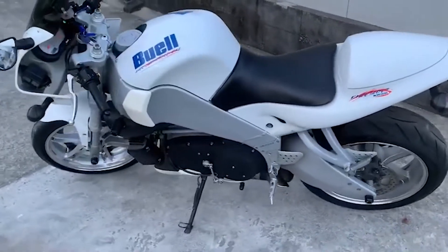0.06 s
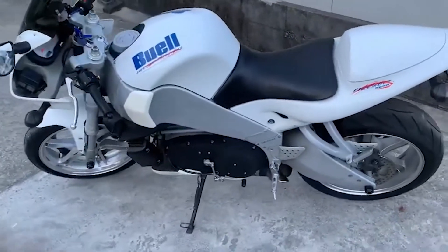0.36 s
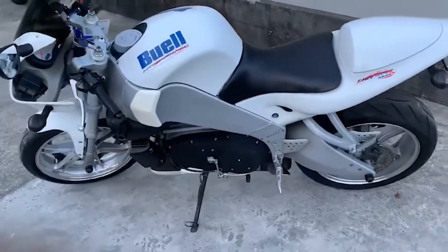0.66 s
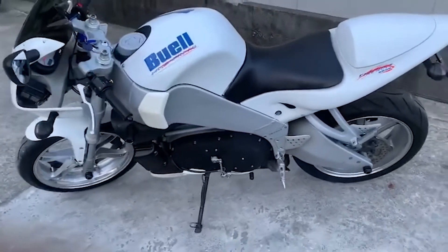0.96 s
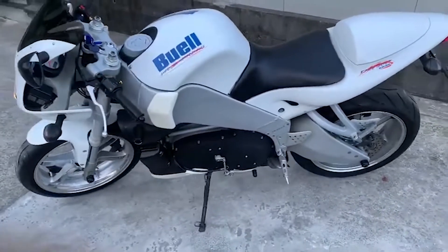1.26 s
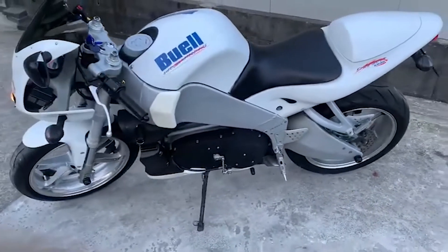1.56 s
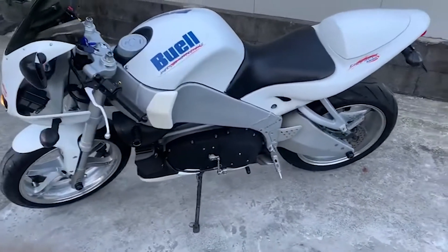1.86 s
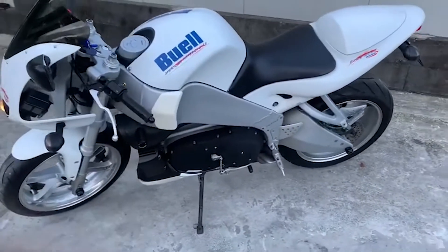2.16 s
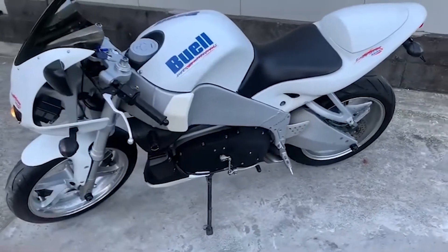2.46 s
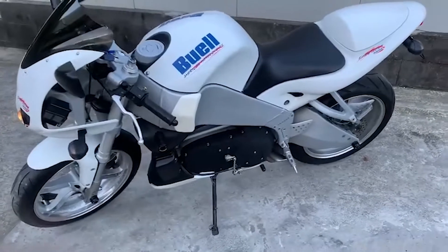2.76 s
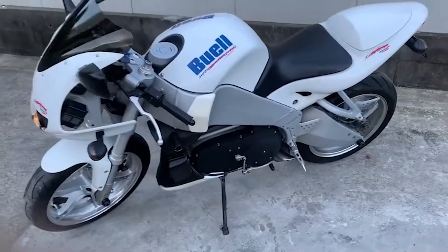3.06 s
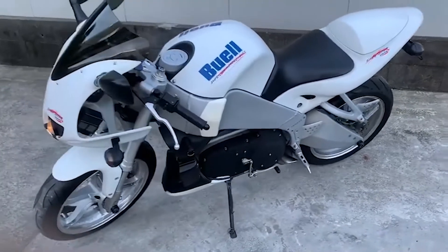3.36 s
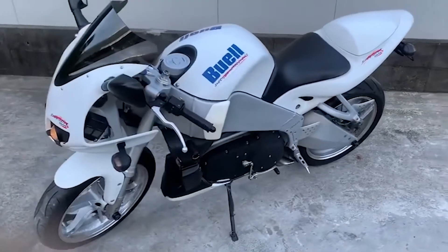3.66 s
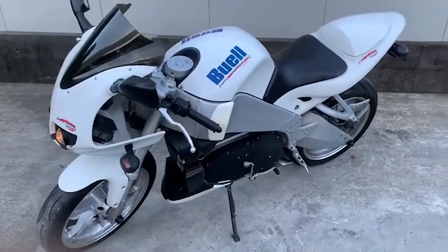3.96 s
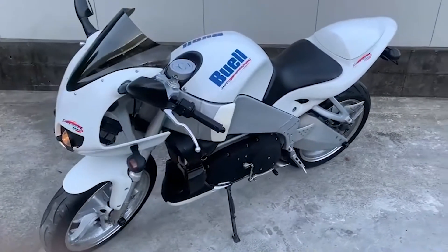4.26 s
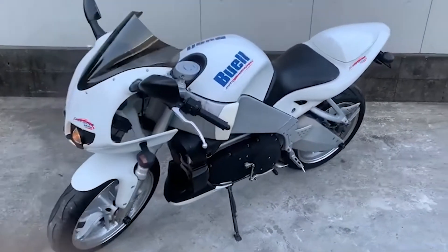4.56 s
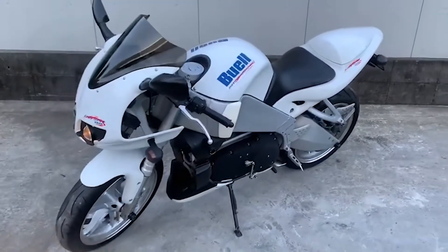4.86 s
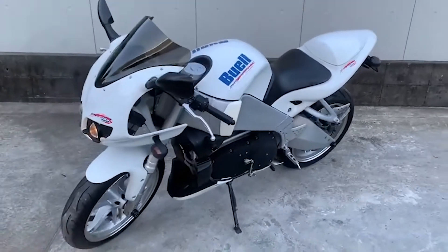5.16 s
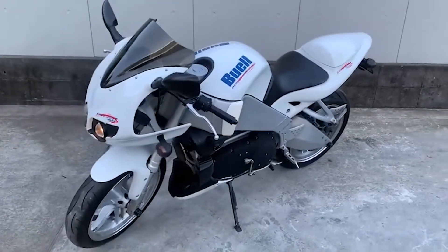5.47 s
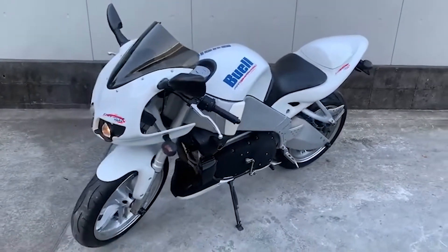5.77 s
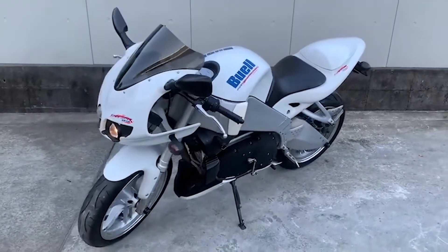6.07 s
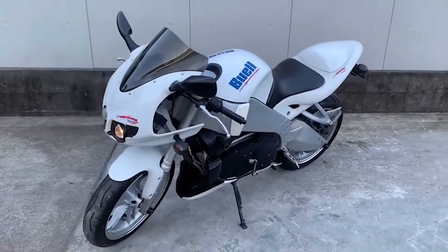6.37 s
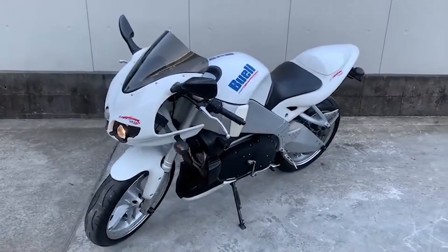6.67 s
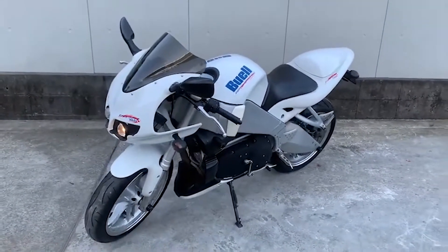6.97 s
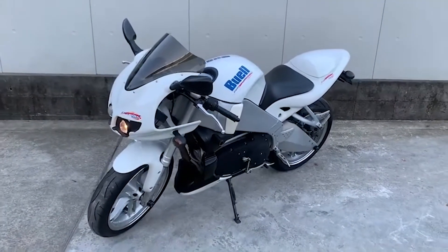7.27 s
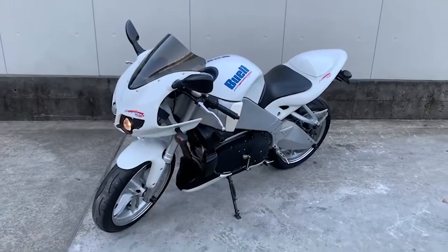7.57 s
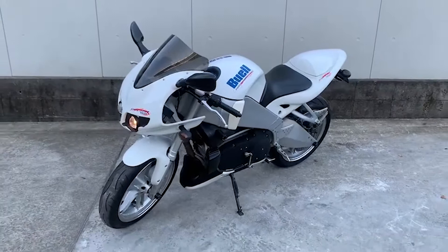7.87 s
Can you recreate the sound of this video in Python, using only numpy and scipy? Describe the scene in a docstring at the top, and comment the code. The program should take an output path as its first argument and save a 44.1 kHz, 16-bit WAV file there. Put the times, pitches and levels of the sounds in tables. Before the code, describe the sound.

A parked two-cylinder motorcycle idles outdoors with a deep, limping beat. Each firing thumps through the silencer with a sharp spit of hiss, and now and then one is weak or skipped. Valves tick and engine parts clatter under a faint whine. The microphone moves slowly from the side to the front, so the exhaust softens a little and a light fairing rattle comes in toward the end.

```python
"""A motorcycle idling in a yard

An air-cooled two-cylinder engine lopes on a concrete yard, skipping a firing now and then.
Each firing spits a sharp hiss and thumps through the silencer. Valves and other moving parts
clatter, a gear whines and the fairing (the front cover) rattles. The listener walks slowly
from the side of the machine to its front, near a wall."""
import sys
import numpy as np
from scipy import signal
from scipy.fft import rfft, irfft, next_fast_len
from scipy.io import wavfile
from scipy.ndimage import uniform_filter1d, map_coordinates

SR = 44100
rng = np.random.default_rng(int(sys.argv[2]) if len(sys.argv) > 2 else 0)


def dump(signal):
    """Clip the signal to [-1, 1] and save it as 16-bit WAV at the path in sys.argv[1]."""
    limited = np.clip(np.atleast_2d(signal).T, -1, 1)
    pcm = np.round(limited * 32767).astype(np.int16)
    wavfile.write(sys.argv[1], SR, pcm)


N = 358520

# the drifting idle speed: (time [s], speed [crank turns a minute])
IDLE_SPEED = [(0.0, 1078), (0.32, 1130), (1.22, 1017), (1.59, 1081), (1.83, 1000), (2.46, 1110),
              (3.05, 981), (3.61, 1043), (4.26, 1039), (4.39, 1050), (4.88, 986), (5.49, 1059),
              (6.11, 1022), (6.7, 1014), (7.28, 1092), (7.64, 1042), (8.13, 1036)]
# where the listener is: (time [s], place [0 side, 1 front corner, 2 front])
LISTENER_PATH = [(0, 0.15), (1.2, 0.37), (3.4, 0.75), (4.2, 1.06), (5.4, 1.76), (8.13, 1.95)]


def amp(db):
    """Turn decibels into a gain."""
    return 10 ** (np.asarray(db) / 20)


def unit(x):
    """Scale x to an average strength (rms) of 1."""
    return x / np.sqrt(np.mean(x ** 2) + 1e-20)


def along(points, hz):
    """Read between (frequency, value) points on a log frequency axis."""
    freqs, values = np.transpose(points)
    return np.interp(np.log(hz + 1), np.log(freqs + 1), values)


def curve(points):
    """Join (time, value) points into one value per sample."""
    return np.interp(np.arange(N) / SR, *np.transpose(points))


def wobble(rate):
    """A smooth curve through `rate` random values a second."""
    return map_coordinates(rng.standard_normal(int(N * rate / SR) + 4), [np.arange(N) * rate / SR])


def filtered(x, response):
    """Scale and shift each frequency in x by response(hz)."""
    size = next_fast_len(N + SR // 2)
    return irfft(rfft(x, size) * response(np.fft.rfftfreq(size, 1 / SR)), size)[..., :N]


def coloured(x, spectrum):
    """Shape the tone of x with (frequency, level) points, then scale it to strength 1."""
    return unit(filtered(x, lambda hz: amp(along(spectrum, hz))))


def noise():
    """Two unrelated white noises."""
    return rng.standard_normal((2, N))


def pulse_response(gain, size=16384):
    """How a body with this gain(hz) answers one sharp push, as early as it can (minimum phase)."""
    cepstrum = irfft(np.log(gain(np.fft.rfftfreq(size, 1 / SR)) + 1e-6))
    cepstrum[1:size // 2] *= 2
    cepstrum[size // 2 + 1:] = 0
    return irfft(np.exp(rfft(cepstrum)))


def play(times, gains, shape):
    """Place one scaled copy of shape at each time."""
    hits = np.bincount(np.round((times + 1) * SR).astype(int), gains, N + 2 * SR)
    return signal.fftconvolve(hits, shape)[SR:SR + N]


def place_each(times, sounds):
    """Place a different short sound at each time."""
    where = np.round((times + 1) * SR).astype(int)[..., None] + np.arange(sounds.shape[-1])
    return np.bincount(where.ravel(), sounds.ravel(), N + 2 * SR)[SR:SR + N]


def puff(rise_s, decay_s):
    """A loudness shape that swells to 1 and dies away."""
    t = np.arange(SR // 8) / SR
    shape = (1 - np.exp(-(t / rise_s) ** 2)) * np.exp(-t / decay_s)
    return shape / shape.max()


def struck(times, db, modes, rise_s, scatter_db, size=4000):
    """Blows ring a body's own tones (modes); each tone falls 60 dB in its ring time."""
    hz, level, ring_s = np.transpose(modes)[..., None]
    t = np.arange(size) / SR
    rings = amp(level - 60 * t / ring_s) * np.exp(2j * np.pi * hz * t) * (1 - np.exp(-t / rise_s))
    draws = rng.standard_normal((len(times), 3, len(modes))).transpose(1, 0, 2)
    strengths = amp(db[:, None] + scatter_db * draws[0])
    phases = np.exp(2j * np.pi * draws[1:])
    return np.array([place_each(times, blows) for blows in ((strengths * phases) @ rings).real])


def stereo(pair, mid_gain, side_gain, direct):
    """Make left and right; the `direct` share of the side is the mid sound a quarter wave ahead."""
    mid = filtered(pair[0], mid_gain)
    linked = filtered(pair[0], lambda hz: 1j * direct * side_gain(hz))
    side = linked + np.sqrt(1 - direct ** 2) * filtered(pair[1], side_gain)
    return np.array([mid + side, mid - side])


def spread(pair):
    """Spread an engine sound broadly between left and right."""
    # stereo width: (frequency [Hz], side over mid [dB])
    width = [(60, -5), (280, -57), (500, -8), (1200, -9.5), (2000, -2.5), (2700, -4.5), (3200, 6.5),
             (4000, -15), (5300, 14.5)]
    return stereo(pair, np.ones_like, lambda hz: amp(along(width, hz)), direct=0.56)


def treble_spread(pair, half_turn_hz=4900, in_step_hz=6100):
    """Treble reaches left and right at different times, so how well they line up depends on pitch."""
    angle = lambda hz: np.pi * np.maximum((hz - in_step_hz) / half_turn_hz, 0.12)
    return stereo(pair, lambda hz: np.cos(angle(hz)), lambda hz: np.sin(angle(hz)), direct=-.7)


def firings(lag_s=.0151, slow_s=.3, catch_up_s=.911, rebound_db=1.43, rebound_s=0.13):
    """Two cylinders fire in turn, each once in two crank turns. Gives times, thump dB and hiss dB."""
    # weak or missed firings: (time [s], level against a full burn [dB])
    stumbles = [(0.15, -8), (0.32, -5), (0.37, -29.5), (0.48, -15), (0.94, -25.5), (1.05, -14),
                (1.24, -2.5), (1.29, -12), (1.41, -5), (1.64, -21), (1.75, -11), (1.99, -3), (2.22, -11),
                (2.4, -3), (2.45, -11.5), (2.55, -18), (2.89, -19.5), (3.01, -12), (3.26, -4), (3.44, -3.5),
                (3.49, -4.5), (3.67, -2), (3.72, -3.5), (3.9, -9), (3.95, -4), (4.13, -7), (4.18, -23.5),
                (4.3, -3), (4.53, -21.5), (4.65, -12), (4.89, -5), (5.08, -7), (5.25, -10), (5.36, -5),
                (5.54, -3.5), (5.59, -22.5), (5.71, -24.5), (5.77, -2.5), (5.94, -19), (6.06, -5.5),
                (6.29, -4), (6.64, -19.5), (6.75, -4), (6.99, -15), (7.1, -10), (7.28, -3.5), (7.33, -7.5),
                (7.55, -11.5), (7.66, -5), (7.84, -2.5), (7.89, -17.5), (8.01, -11)]
    # firings whose hiss has its own strength: (time [s], level [dB])
    odd_spits = [(.04, -27.5), (.1, -29), (.26, -29), (.32, -35), (.43, -27), (.59, -30.5), (.71, -41.5),
                 (.88, -31), (1.12, -29), (1.17, -29), (1.47, -31), (1.58, -28.5), (1.82, -28.5),
                 (1.87, -27.5), (1.94, -29.5), (2.05, -29), (2.17, -31), (2.28, -29.5), (2.33, -26),
                 (2.39, -35.5), (2.5, -28), (2.61, -30), (2.66, -30.5), (2.73, -30), (3.08, -29.5),
                 (3.32, -29.5), (3.44, -35.5), (3.67, -34.5), (3.78, -30), (3.83, -32), (4.01, -28.5),
                 (4.36, -30.5), (4.42, -28.5), (4.59, -29), (4.72, -31), (4.96, -30), (5.13, -33),
                 (5.19, -30.5), (5.42, -29), (5.47, -28), (5.77, -31), (5.82, -27), (5.89, -30.5),
                 (6.0, -30), (6.12, -27.5), (6.24, -31.5), (6.35, -30.5), (6.59, -32), (6.87, -32),
                 (7.16, -32), (7.21, -31), (7.5, -32.5), (7.72, -29.5)]
    cycle = np.cumsum(curve(IDLE_SPEED)) / (2 * 60 * SR)
    number = np.arange(2 * int(cycle[-1]) + 1)
    is_second = number % 2
    # the second cylinder fires before half a cycle is up, so the beat limps
    due = np.interp(number // 2 + .445 * is_second, cycle, np.arange(N) / SR) - .0062
    weak_s, weak_db = np.transpose(stumbles)
    burn_db = np.bincount(abs(due[:, None] - weak_s + lag_s).argmin(axis=0), weak_db, len(number))
    lost = 1 - amp(burn_db)
    since = np.maximum(due[:, None] - due, 0)
    # a lost burn slows the crank: later firings fall behind, then catch up
    times = due + lag_s * ((1 - np.exp(-since / slow_s)) * np.exp(-since / catch_up_s)) @ lost
    # after a miss the crank runs slower and draws in a fuller charge, so the next firings are stronger
    burn_db = burn_db + rebound_db * ((since > 0) * np.exp(-since / rebound_s)) @ lost
    # both sounds fade as the listener walks away from the pipe
    thump_db = 1.8 + .8 * is_second + burn_db - 0.47 * times
    hiss_db = -33.5 + 0.5 * is_second + 4.6 * burn_db - 0.56 * times
    odd_s, odd_db = np.transpose(odd_spits)
    hiss_db[abs(times[:, None] - odd_s).argmin(axis=0)] = odd_db
    return times, thump_db, hiss_db


def exhaust_spit(level_db=4.5, lead_s=.0036, swell_s=.0068, decay_s=.009, tail_s=.025, split_hz=9500):
    """As the exhaust valve opens, gas hisses out just ahead of the thump and trails off."""
    times, _, db = firings()
    t = np.arange(-SR // 50, SR // 10) / SR
    after = np.maximum(t, 0)
    swell = np.exp(-(np.minimum(t, 0) / swell_s) ** 2)
    blow = swell * (np.exp(-after / decay_s) + amp(-18) * np.exp(-after / tail_s))
    # tone of the spitting gas: (frequency [Hz], level [dB])
    hiss_tone = [(1500, -21), (3000, -13), (4200, -6), (5500, -10), (7000, 1.5), (8600, 3), (11000, 1.5),
                 (13500, -2), (15600, -4.5)]
    hiss = coloured(noise(), hiss_tone)
    dull = filtered(hiss, lambda hz: 1 / (1 + (hz / split_hz) ** 12))
    jet = 0
    for band in (dull, hiss - dull):  # each varies alone, so spits come duller or brighter
        sizes = amp(db + level_db + 1.3 * rng.standard_normal(len(times)))
        flutter = amp(1.2 * wobble(400))
        jet = jet + play(times - lead_s + t[0], sizes, blow) * flutter * band
    return treble_spread(jet)


def pipe_gas(flow_db=-33, chuff_db=-37.5, bark_db=-7):
    """Swirling gas chuffs down the pipe with each pulse; the second cylinder barks on a hard burn."""
    # tone of the gas in the pipe: (frequency [Hz], level [dB])
    chuff_tone = [(15, -22), (28, -9), (42, 0), (60, -7.5), (100, -4), (130, -3.5), (190, -17), (290, -14),
                  (380, -19.5), (800, -70)]
    # tone of the bark: (frequency [Hz], level [dB])
    bark_tone = [(200, 3), (320, -5), (450, -4), (700, -6), (1300, -2), (2000, -8), (4000, -49)]
    times, thump_db, hiss_db = firings()
    flow = amp(flow_db) + play(times - .012, amp(thump_db + chuff_db), puff(.005, .054))
    bark = play(times[1::2] - .013, amp(hiss_db[1::2] + bark_db), puff(.0069, .034))
    return spread(flow * coloured(noise(), chuff_tone) + bark * coloured(noise(), bark_tone))


def pipe_ring(level_db=-7, lead_s=0.0064):
    """Every blast leaves the thin exhaust pipes ringing, each time with a new mix of tones."""
    # tones of the pipes: (frequency [Hz], level [dB], ring time [s])
    modes = [(3780, -3, 0.1), (4080, 1, 0.053), (4580, 1, 0.08), (5260, -4, 0.076), (6860, 6.5, 0.072),
             (6990, 2, .03), (8000, -14, 0.037), (8200, -16, 0.044), (8600, -8, .04), (9400, -25, 0.03),
             (10600, -16, .05), (12500, -6, .05), (13400, -3, .035)]
    times, _, db = firings()
    return treble_spread(struck(times - lead_s, db + level_db, modes, rise_s=0.0071, scatter_db=3.5))


def silencer_thump(cutoff_hz=1100):
    """Each firing sends one pressure pulse through the silencer."""
    # the silencer's answer to a pulse: (frequency [Hz], level [dB])
    silencer = [(20.0, -28.0), (38.0, 30.0), (55.0, 40.5), (66.0, 42.5), (78.0, 40.0), (87.0, 36.5),
                (101.0, 38.0), (117.0, 30.0), (131, 32), (150.0, 26.5), (205.0, 12.5), (235, 17),
                (315.0, 19.5), (365.0, 3.0), (900.0, -16.0)]
    times, db, _ = firings()
    thump = pulse_response(lambda hz: amp(along(silencer, hz)) / np.sqrt(1 + (hz / cutoff_hz) ** 4))
    return play(times, -amp(db + .3 * rng.standard_normal(len(times))), thump)


def clatter(cycles, jitter_s=0.0011, parts=36, size=1800):
    """Chain, cams and pistons knock at set points of every cycle, each with its own metallic ring."""
    offsets = (np.arange(parts) + rng.uniform(0, 1, parts)) / parts * np.diff(cycles).mean()
    rings = rng.standard_normal((2, parts, size)) * puff(.0004, .008)[:size]
    times = cycles[:, None] + offsets + jitter_s * rng.standard_normal((len(cycles), parts))
    sizes = amp(rng.uniform(-4.0, 3.2, parts) + rng.uniform(-2.9, 3.5, times.shape))
    return unit(np.array([place_each(times, sizes[..., None] * ring) for ring in rings]))


def engine_cases(intake_db=-4, surge_db=1.1):
    """Moving parts clatter and churn inside the metal cases, whose tone changes along the walk."""
    # the cases from the side: (frequency [Hz], level [dB])
    side = [(100, -27), (170, -3), (231, -21), (318, 6), (362, -3.5), (415, 5.5), (480, 3), (569, -13),
            (639, 2), (818, -13.5), (1110, -6), (1620, -12), (1820, -18), (2230, -17), (2940, -20),
            (5500, -32.5), (7150, -44), (12100, -120)]
    # from the front corner: (frequency [Hz], level [dB])
    corner = [(100, -24), (170, -1.5), (304, -1.5), (342, -4.5), (478, -2), (648, -6), (687, -10.5),
              (842, -6), (1420, -12), (1960, -20.5), (2400, -12), (2740, -17.5), (3070, -27.5),
              (3400, -19.5), (5500, -45), (7150, -39), (12100, -120)]
    # from the front: (frequency [Hz], level [dB])
    front = [(100, -2.5), (170, -10.5), (313, -3), (352, -13), (413, -3), (514, -7.5), (658, 0.5),
             (1160, -17.5), (1530, -9), (1850, -9.5), (2110, -23), (2740, -14), (3210, -27.5),
             (3610, -28.5), (5500, -46), (7150, -66), (12100, -120)]
    # loudness of the cases: (time [s], level [dB])
    loudness = [(0, -28.5), (1, -30.5), (2.5, -31), (5, -30.5), (6, -32), (8.13, -32.5)]
    times, db, _ = firings()
    cycles = times[::2]
    load = play(times - .005, amp(db), puff(.005, .025))  # every burn shakes the parts harder
    shaking = (clatter(cycles) + amp(-3) * noise()) * amp(load)
    place = curve(LISTENER_PATH)
    heard = sum(np.clip(1 - abs(place - k), 0, 1) * coloured(shaking, tone)
                for k, tone in enumerate([side, corner, front]))
    # a hollow rush of air comes once a cycle: (frequency [Hz], level [dB])
    air_tone = [(220, -25), (330, -1), (450, 0), (580, -4), (850, -18), (1500, -50)]
    gulp = play(cycles + 0.07, np.ones(len(cycles)), puff(.033, .011))
    screening = amp(intake_db - 3 * place)  # the fairing screens it from the front
    intake = screening * gulp * coloured(noise(), air_tone)
    return spread(amp(curve(loudness) + surge_db * wobble(16)) * (heard + intake))


def chain_sizzle(level_db=-43, flutter_db=2.5):
    """The running chain and the ringing cooling fins keep up a fine, restless sizzle."""
    # tone of the sizzle: (frequency [Hz], level [dB])
    tone = [(2500, -16), (4000, 4), (5500, 0), (6800, 5.5), (8500, -5.5), (11000, 4.5), (12600, -5.5),
            (13500, -4), (15600, -17)]
    return treble_spread(amp(level_db + flutter_db * wobble(180)) * coloured(noise(), tone))


def gear_whine(pitch_hz=651, level_db=-2.0, warble=0.4):
    """Meshing drive teeth sing and warble once a crank turn, warbling more from the front."""
    # loudness of the whine: (time [s], level [dB])
    loudness = [(0, -42), (.3, -34.5), (.7, -39.5), (1, -35), (1.25, -47), (1.65, -45), (2.0, -37.5),
                (2.6, -50), (3.5, -52), (3.95, -50), (4.1, -39), (4.8, -42), (5.2, -34), (5.5, -38),
                (5.85, -35.5), (6.15, -53), (6.6, -36), (7.0, -48), (7.35, -38), (7.9, -41), (8.13, -37)]
    crank_angle = 2 * np.pi * np.cumsum(curve(IDLE_SPEED)) / (60 * SR)
    phase = 2 * np.pi * pitch_hz * np.arange(N) / SR + .1 * wobble(22) + .4 * wobble(4)
    phase += warble * curve(LISTENER_PATH) * np.sin(crank_angle)
    return amp(curve(loudness) + level_db) * unit(amp(.7 * wobble(14)) * np.sin(phase))


def fin_pings(level_db=-53, range_db=3, count=300):
    """Small knocks of the moving parts make the cooling fins ping."""
    # tones of the fins: (frequency [Hz], level [dB], ring time [s])
    modes = [(3510, 3.5, 0.08), (3720, 4, 0.097), (3940, 2.5, 0.059), (4090, 1, 0.048), (4440, -1.5, .05),
             (5120, -4.5, 0.084)]
    shift, strength = rng.uniform(-1, 1, (count, 2)).T
    times = (np.arange(count) + shift) / count * N / SR
    return spread(struck(times, level_db + range_db * strength, modes, rise_s=0.00084, scatter_db=4.5))


def airbox_boom(level_db=2.0, delay_s=0.037, other_delay_s=.081, other_db=-2):
    """Each cylinder sucks in air once a cycle, burning or not, and the air filter box booms softly."""
    # the box's answer to one breath: (frequency [Hz], level [dB])
    airbox = [(25, -41), (45, 7), (62, -48), (80, 25), (100, 27.5), (140, -1.5), (250, -24), (600, -60)]
    cycles = firings()[0][::2]
    boom = pulse_response(lambda hz: amp(along(airbox, hz)))
    sizes = amp(level_db + 2 * rng.standard_normal((2, len(cycles))))
    first = play(cycles + delay_s, sizes[0], boom)
    return first + play(cycles + other_delay_s, amp(other_db) * sizes[1], boom)


def hollow_knocks():
    """Slack in the drive now and then knocks its hollow case, heard from the side."""
    # the hardest knocks: (time [s], level [dB])
    knocks = [(.036, -22.5), (.114, -22.5), (.194, -27), (.509, -21), (.733, -27), (.812, -26),
              (1.092, -22), (1.593, -26.5), (2.095, -23), (2.249, -27.5), (2.915, -26), (3.522, -26)]
    # tones of the drive case: (frequency [Hz], level [dB], ring time [s])
    modes = [(405, -5, .06), (452, 3.5, .08), (505, -8, .05)]
    times, db = np.transpose(knocks)
    return spread(struck(times, db, modes, rise_s=0.0023, scatter_db=0))


def valve_taps(level_db=-43.0, delay_s=0.0569, other_delay_s=0.093, other_db=-12):
    """The valves snap shut after each firing and ring their covers, one cylinder more than the other."""
    # tones of the valve covers: (frequency [Hz], width [Hz], level [dB])
    modes = [(1556, 135, 3), (2337, 41, 5), (2426, 29, 6.5), (2687, 34, 11), (2900, 63, 1), (2990, 86, 0.5),
             (3300, 110, -3.5), (3510, 47, -2), (3930, 120, -9)]
    cycles = firings()[0][::2]
    sizes = amp(rng.normal(0, .4, (2, len(cycles))))
    rattle = puff(.003, .022)
    taps = play(cycles + delay_s, sizes[0], rattle)
    taps += play(cycles + other_delay_s, amp(other_db) * sizes[1], rattle)
    covers = lambda hz: sum(
        (-1) ** k * amp(db) * 1j * hz * width / (centre ** 2 - hz ** 2 + 1j * hz * width)
        for k, (centre, width, db) in enumerate(modes))
    ring = filtered(noise(), covers)
    # the mix of tones changes from tap to tap, their total strength does not
    ring /= np.sqrt(abs(uniform_filter1d(ring ** 2, size=600)) + 1e-12)
    # from the side the frame hides the covers, from the front the fairing does
    place = curve(LISTENER_PATH)
    hidden_db = -4 * np.clip(1 - place, 0, 1) - np.clip(place - 1, 0, 1)
    return spread(amp(level_db + hidden_db) * unit(taps * ring))


def fairing_rattle(level_db=-8):
    """Shaken by the engine, loose parts knock behind the fairing in short, ringing clusters."""
    # the knocks: (time [s], level [dB])
    knocks = [(0.959, -31), (5.5024, -30), (5.6013, -29), (5.728, -29), (6.1739, -31), (6.323, -31),
              (6.871, -29), (7.022, -25.5), (7.0763, -31), (7.1097, -37), (7.126, -35), (7.21, -25.5),
              (7.224, -34), (7.243, -34), (7.3542, -32), (7.426, -29), (7.574, -29.5), (7.657, -34),
              (7.7695, -29), (7.7898, -27), (7.911, -29.5)]
    # tones of the fairing: (frequency [Hz], level [dB], ring time [s])
    modes = [(780, -2, .04), (1195, -1, .035), (1460, 7, 0.051), (1590, 2, 0.097), (1806, 2.5, 0.055),
             (1920, -15, .04), (2420, -17, .05), (2470, -5, .05)]
    times, db = np.transpose(knocks)
    return spread(struck(times, db + level_db, modes, rise_s=0.0011, scatter_db=0.5))


def yard_echo(x, spots=6):
    """Wall and ground give a short, blurred echo that changes as the listener walks."""
    # how long the yard echoes: (frequency [Hz], time to fall 60 dB [s])
    echo_time = [(100, 0.027), (1000, 0.079), (10000, 0.013)]
    hz, t, bands = signal.stft(rng.standard_normal((spots, 2, SR // 6)), SR, nperseg=256)
    tails = signal.istft(bands * amp(-60 * t / along(echo_time, hz)[:, None]), SR, nperseg=256)[1]
    spot = np.linspace(0, spots - 1, N)
    echo = 0
    for k, tail in enumerate(tails):
        nearness = np.sqrt(np.maximum(1 - abs(spot - k), 0))
        delayed = np.pad(x * nearness, (500, 0))[None]
        echo = echo + signal.oaconvolve(delayed, tail / np.linalg.norm(tail[0]), axes=1)[:, :N]
    return echo


def scene():
    """Add up the idling machine and its echo."""
    metal = engine_cases() + valve_taps() + hollow_knocks() + fairing_rattle()
    metal += fin_pings() + chain_sizzle()
    hiss = exhaust_spit() + pipe_ring()
    echo = yard_echo(amp(-11) * metal[0] + amp(-17) * hiss[0])
    return silencer_thump() + airbox_boom() + pipe_gas() + hiss + metal + gear_whine() + echo


def record(dry, top_hz=15750):
    """Make left and right slightly unequal in level and cut the highest treble."""
    # balance: (frequency [Hz], left over right [dB])
    balance = [(30, -2), (120, -3.5), (250, -3), (500, -1), (1000, 0.7), (2000, 0.5), (4500, -2.5),
               (8000, 0.5)]
    tilt = lambda hz: amp(np.array([[.5], [-.5]]) * along(balance, hz))
    return filtered(dry, lambda hz: tilt(hz) * (hz < top_hz))


dry = scene()
out = record(dry)
dump(out)
```